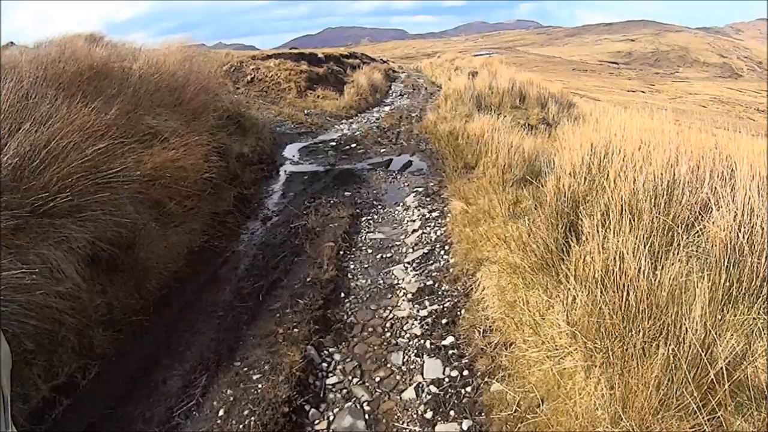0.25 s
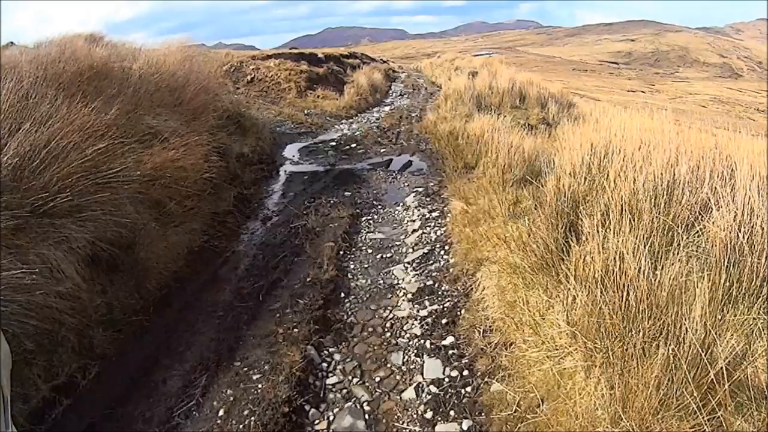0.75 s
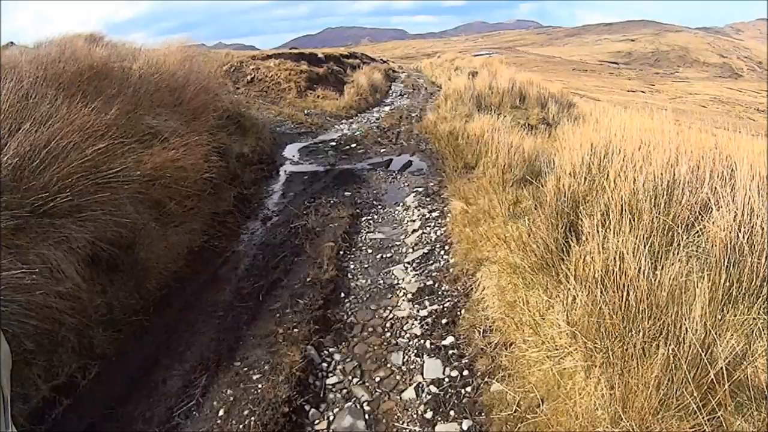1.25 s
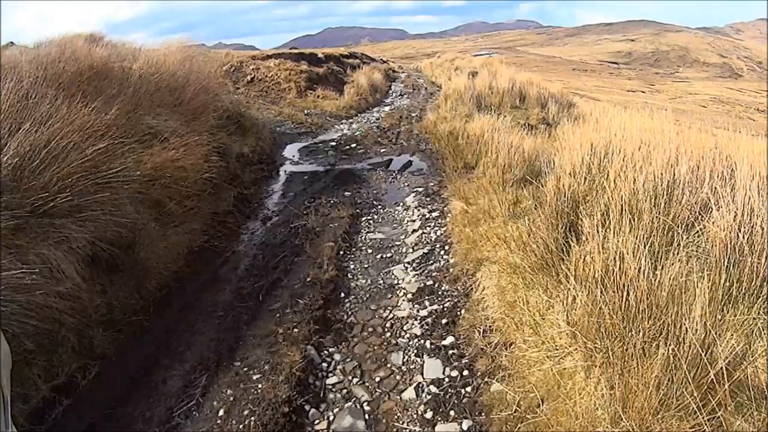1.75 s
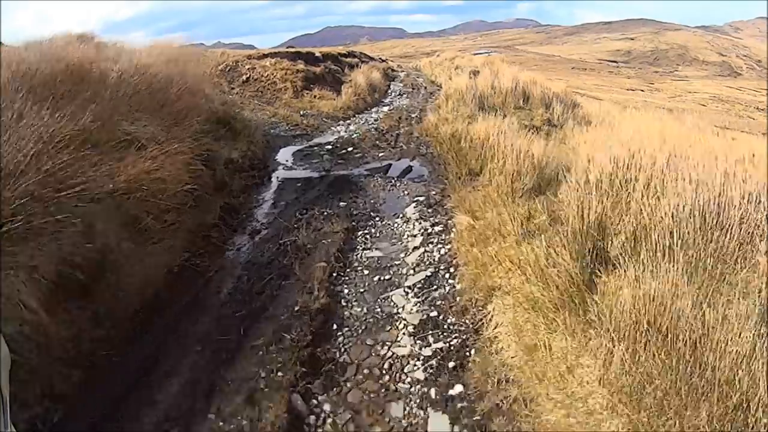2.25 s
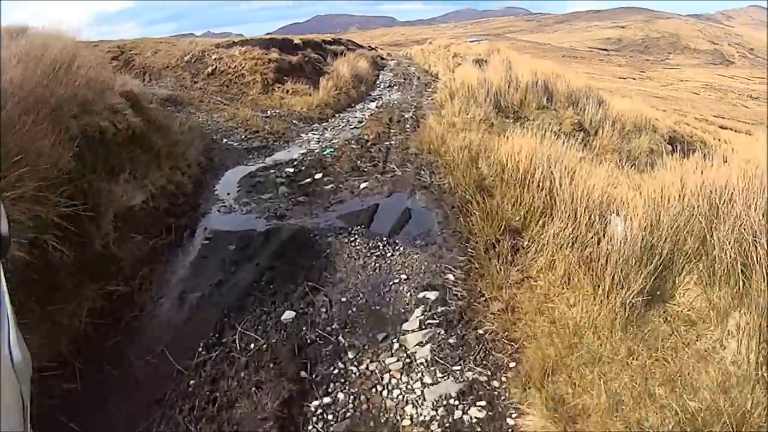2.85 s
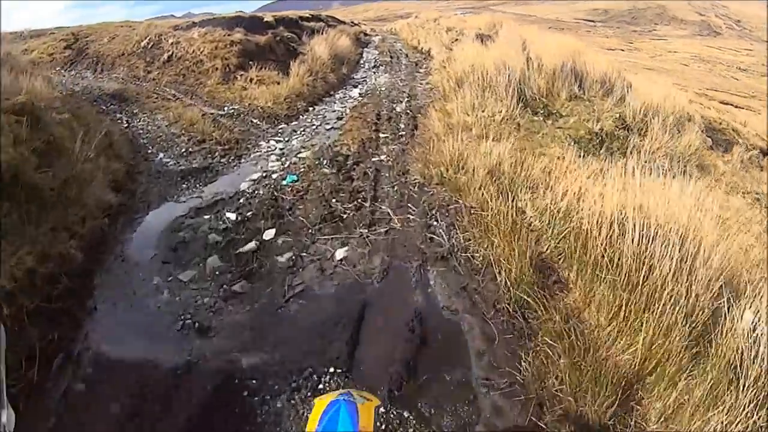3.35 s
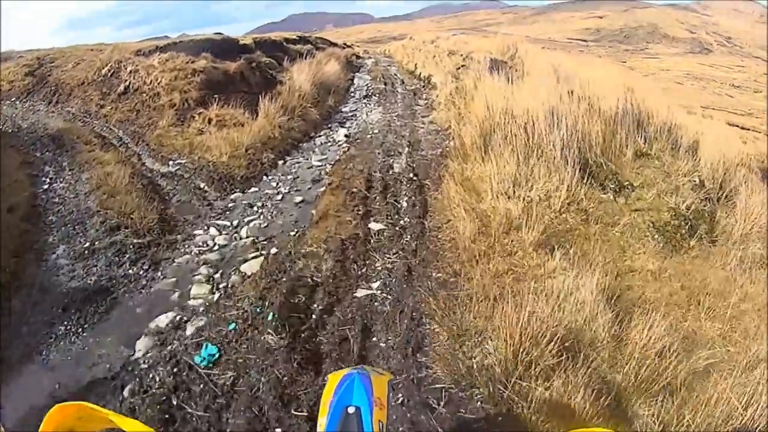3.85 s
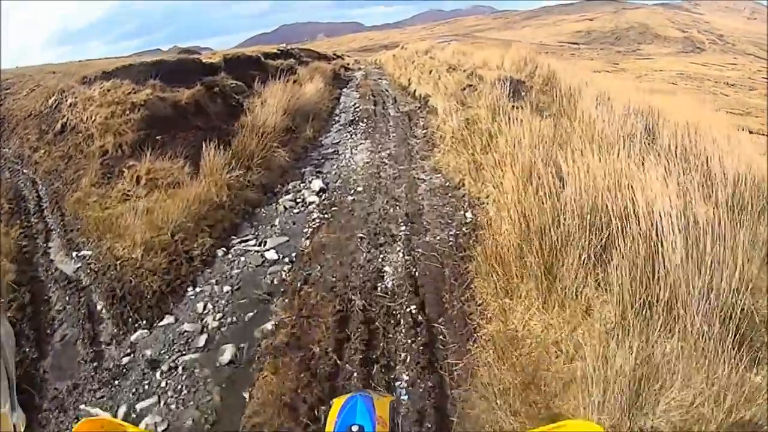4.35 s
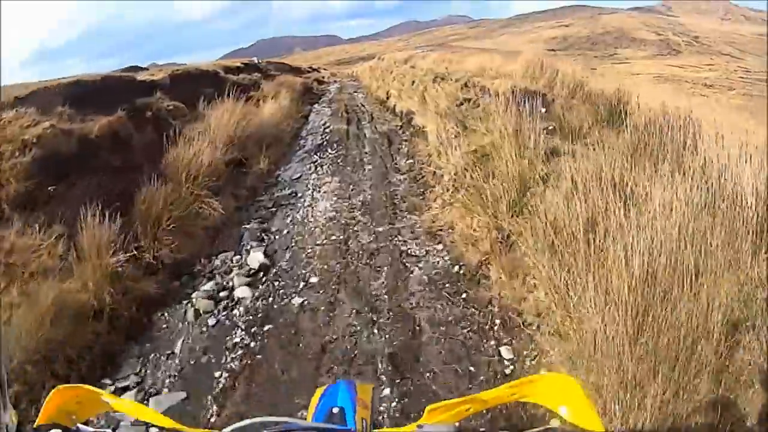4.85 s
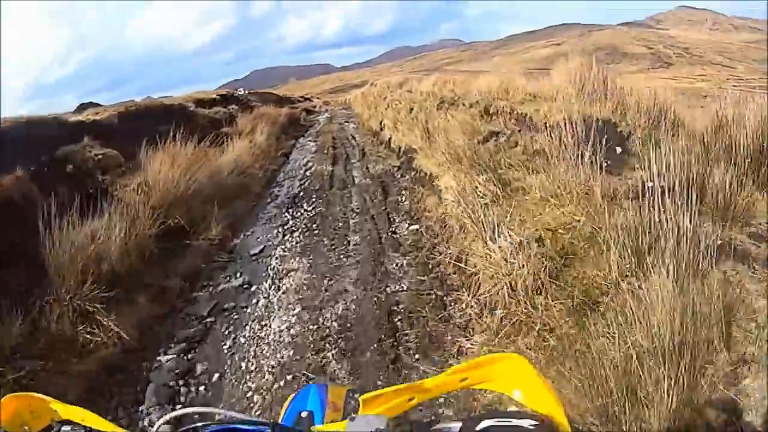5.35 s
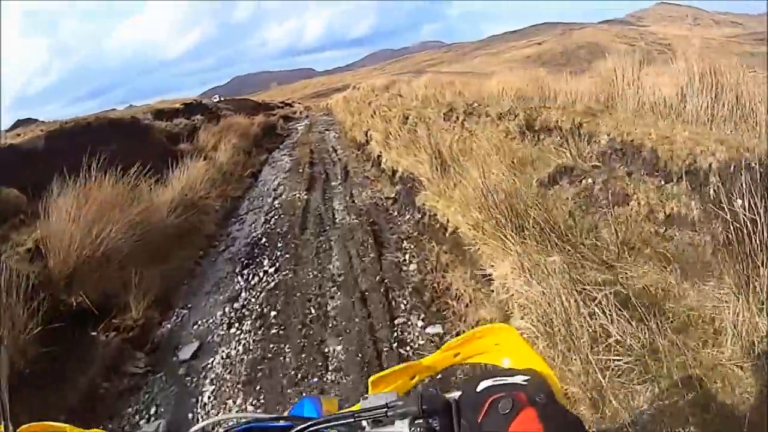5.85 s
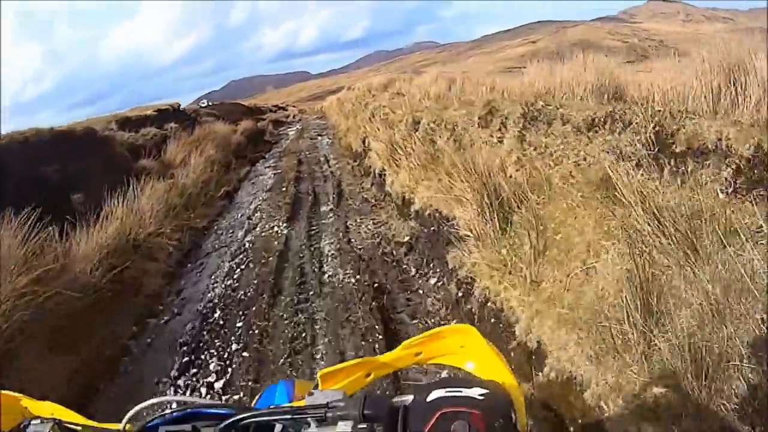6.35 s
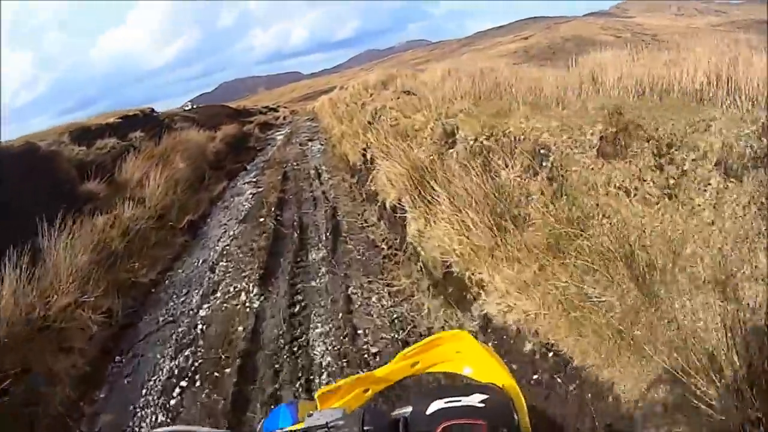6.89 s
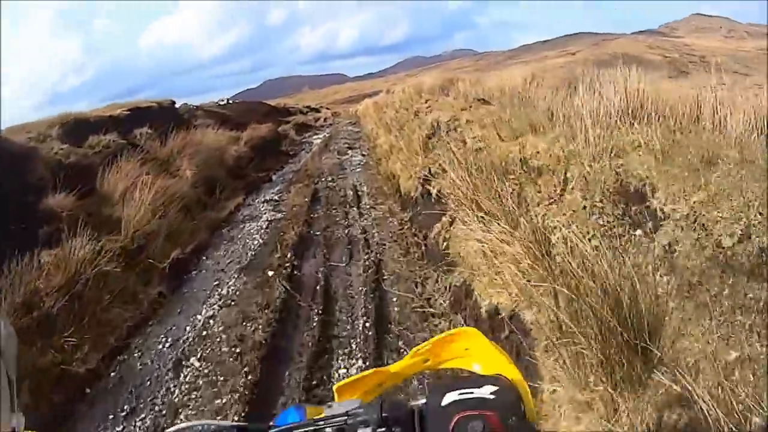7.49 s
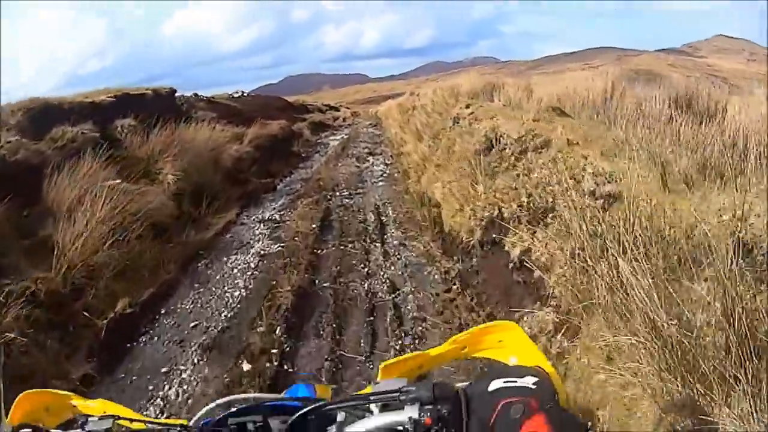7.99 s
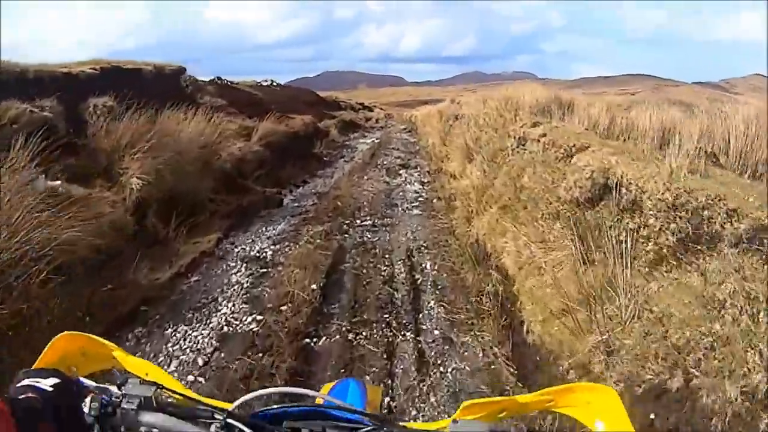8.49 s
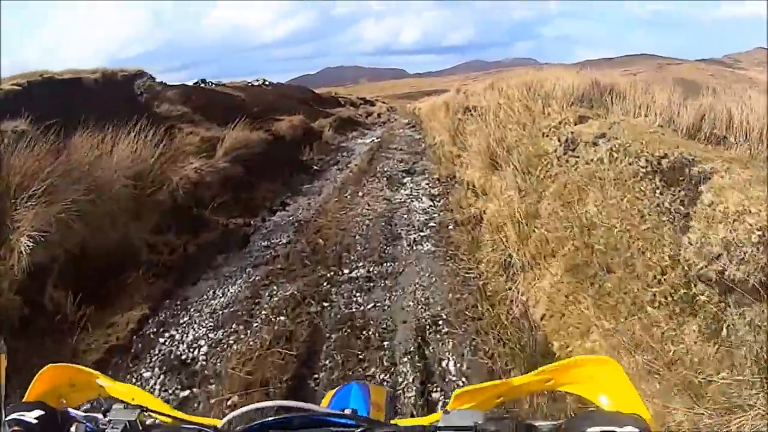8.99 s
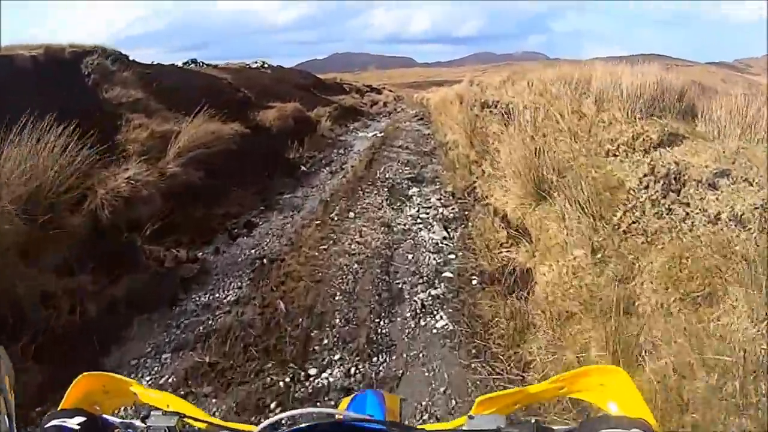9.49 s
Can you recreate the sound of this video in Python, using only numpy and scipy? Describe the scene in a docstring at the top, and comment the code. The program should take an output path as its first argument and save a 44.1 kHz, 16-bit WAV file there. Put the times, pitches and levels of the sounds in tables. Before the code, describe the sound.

A single-cylinder dirt bike plods along a stony wet track, engine clattering and softly puttering, with dull mount knocks and low wind rumble.

```python
"""A stony track of wet gravel, ridden by a plodding single-cylinder four-stroke dirt bike, heard at the
rider's own camera. The exhaust putters softly as sums of decaying pipe resonances. Engine clatter and
tyre crunch are coloured noise, shaped by the engine cycle, the ride and the grains of gravel.
Bumps set off modes of the camera mount, and slowly modulated low noise rumbles as wind on the microphone."""
import sys
import numpy as np
from scipy import signal
from scipy.fft import rfft, irfft
from scipy.io import wavfile
from scipy.ndimage import uniform_filter1d

SR = 44100
rng = np.random.default_rng(int(sys.argv[2]) if len(sys.argv) > 2 else 0)


def dump_mix(stems):
    """Bounce the given channels to the path in sys.argv[1] as a 16-bit WAV at rate SR."""
    frames = np.atleast_2d(stems).T  # one column per channel
    limited = np.clip(frames, -1, 1)  # hard clip at full scale
    pcm = np.round(limited * 32767).astype(np.int16)
    wavfile.write(sys.argv[1], SR, pcm)


N = 429093
T = np.arange(N) / SR
HZ = np.fft.rfftfreq(N, 1 / SR)

# Engine speed and throttle. Each row: time in seconds, firings per second, relative exhaust level in dB.
ENGINE = [(0.0, 20.59, -21.5), (0.28, 19.29, -24.5), (0.55, 20.66, -19.5), (0.86, 24.9, -20.5),
          (1.1, 25.28, -28.0), (1.68, 20.07, -33.0), (1.96, 20.05, -47.5), (2.25, 19.62, -31.5),
          (2.82, 20.5, -23.0), (3.87, 22.37, -23.0), (4.4, 20.36, -26.0), (4.71, 20.94, -20.5),
          (5.49, 18.52, -41.5), (6.56, 16.15, -29.0), (7.25, 15.42, -32.0), (7.8, 17.4, -21.0),
          (8.07, 16.42, -29.5), (9.73, 14.27, -30.5)]
# How hard the bike rattles over the ground. Each row: time in seconds, relative clatter level in dB.
RIDE = [(0.0, -17.5), (0.24, -21.5), (0.95, -18), (1.54, -23), (1.7, -20), (1.98, -22.5), (2.41, -20),
        (4.2, -20.5), (4.31, -22.5), (5.01, -23), (5.66, -26), (7.07, -26.5), (7.15, -25), (7.34, -27.5),
        (7.86, -23), (8.21, -27), (8.62, -25.5), (9.73, -27)]
# seconds by which exhaust and knocks reach the right port sooner
PORT_LAG = .00056
# engine speed and clatter level in easy riding; treble and tyre hiss grow from there
EASY_FIRINGS_PER_S, EASY_DB = 17, -23


def exhaust(level_db=-2, lead=0.00596, uneven_db=1, detune=0.022, rasp=0.1):
    """Impulsive excitation of resonators: each firing puffs through the silencer, whose modes swell and die."""
    # Pipe resonances. Each row: nominal frequency in Hz, relative level in dB, swell time in seconds.
    pipe = [(143, -8.5, 0.0028), (277.5, 3, 0.0055), (253.2, -10.5, 0.015), (321, -12.5, 0.012),
            (501, -14.5, 0.011)]
    out = np.zeros((2, N))
    throttle_db = curve(ENGINE, axis=2)
    t = np.maximum(np.arange(4000) / SR - [[PORT_LAG], [0]], 0)
    for s, draws in zip(cycle_times(0), rng.standard_normal((300, len(pipe), 2))):
        puff = 0
        for (hz, db, rise), (size, off) in zip(pipe, draws):
            tone = np.sin(2 * np.pi * hz * (1 + detune * off) * t)
            puff = puff + amp(db + uneven_db * size) * swell(t, rise) * tone
        add(out, s - lead, amp(level_db + throttle_db[int(s * SR)]) * puff)
    turbulence = 1 + rasp * drift(260)  # roughens each puff
    return out * turbulence * amp([[1], [-1]])


def clatter(level_db=-0.02, whirr_db=-3, throb_db=1.0, throb_share=0.68, rise=0.0037, uneven_db=2.0,
            slop=0.0034, clack_db=-1, clack_rise=0.0019, cruise_db=-27):
    """Superposed impact powers: valves and piston strike the casing over the whirr of gears and chain."""
    # Valve and piston impacts. Each row: share of the cycle after the exhaust puff, relative level in dB,
    # dB more per dB of throttle.
    impacts = [(.17, -3, -0.5), (.5, -9, -0.5), (.63, -3, -0.22), (0.718, -3, 0.44), (.83, -5.5, -0.58)]
    # Broad colour of the clatter. Each row: frequency in Hz, relative level in dB.
    casing = [(90, -22), (200, -24.5), (450, -16.5), (700, -23.5), (900, -18.5), (1060, -11.5), (1600, -11),
              (2150, -11), (2600, -10), (3000, -8.5), (3330, -22.5), (5400, -27), (6100, -40), (12000, -57)]
    # Fixed resonances of the engine covers. Each row: frequency in Hz, width in Hz, lift in dB.
    covers = [(550, 80, 4), (1295, 110, 4), (1560, 90, 2), (2060, 90, 2), (3600, 250, 3.5), (4400, 220, 4),
              (5100, 400, 6)]
    t = np.arange(3000) / SR
    cycles = np.cumsum(curve(ENGINE, axis=1)) / SR
    # the gears load up on each power stroke
    throb = np.cos(2 * np.pi * (cycles - throb_share))
    power = amp(whirr_db + throb_db * throb) ** 2
    load_db = curve(ENGINE, axis=2) - cruise_db
    for share, db, by_load in impacts:
        for s, (size, late) in zip(cycle_times(share), 2 * rng.random((300, 2)) - 1):
            impact_db = db + by_load * load_db[int(s * SR)] + uneven_db * size
            add(power, s + slop * late, amp(impact_db) ** 2 * swell(t, rise))
    # even out the local mean power, so that the ride alone sets the slow level
    power *= amp(curve(RIDE, axis=1) + level_db) ** 2 / uniform_filter1d(power, size=6000)
    for s, db in clacks():
        add(power, s, amp(db + clack_db) ** 2 * swell(t, clack_rise))
    colour_db = spectrum(casing) + sum(db * bump(HZ - hz, width) for hz, width, db in covers)
    noise = np.sqrt(power) * rng.standard_normal((2, N))
    return np.sqrt(power.mean()) * waver(at_ports(noise, colour_db))


def clacks(loose_per_s=2.5, loose_db=-24, loose_spread_db=3.5):
    """A Poisson process: further metallic clacks scatter by chance among those with set times."""
    # Clacks from the bike at set times. Each row: time in seconds, relative level in dB.
    timed = [(0.305, -17), (1.795, -16), (2.608, -16), (3.286, -15), (3.328, -21), (3.374, -16.5),
             (3.794, -12.5), (3.871, -13.5), (4.061, -18), (4.106, -16), (6.201, -20.5), (6.537, -21.5),
             (7.56, -14), (7.896, -24), (8.039, -20), (8.709, -21), (9.024, -24), (9.259, -26),
             (9.397, -19.5)]
    wait, size = rng.random((80, 2)).T
    times = np.cumsum(-np.log(1 - wait)) / loose_per_s
    levels_db = loose_db + loose_spread_db * (2 * size - 1)
    return timed + [(s, db) for s, db in zip(times, levels_db) if s < T[-1]]


def waver(pair, wander_hz=1.73, narrowing_per_db=0.1, treble_hz=5000, treble_width_hz=1600,
          treble_db_per_firing=0.32, patchy_db=2.0, size=1024):
    """Time-varying filtering at constant loudness: rings wander, treble follows engine speed, colour drifts."""
    # Main rings, which shift as bike and rider move. Each row: centre in Hz, wander in Hz,
    # nominal width in Hz, nominal lift in dB, nominal lift wander in dB.
    rings = [(1728, 35, 288, 12, 0.5), (2520, 82, 450, 4, 1.16)]
    hz, s, z = signal.stft(pair, SR, nperseg=size)
    patches = uniform_filter1d(rng.standard_normal(z.shape[1:]), size=3, axis=0)
    patches = uniform_filter1d(patches, size=14, axis=1)
    revs = np.interp(s, T, curve(ENGINE, axis=1)) - EASY_FIRINGS_PER_S
    loudness_db = np.interp(s, T, curve(RIDE, axis=1)) - EASY_DB
    breadth = np.exp(-narrowing_per_db * loudness_db)  # loud clatter has narrower, higher-peaked rings
    treble = bump(hz[:, None] - treble_hz, treble_width_hz)
    lift_db = patchy_db * evened(patches) + treble_db_per_firing * revs * treble
    for ring_hz, off_hz, width_hz, db, off_db in rings:
        shift, lift = (np.interp(s, T, drift(wander_hz)) for _ in range(2))
        ring = bump(hz[:, None] - ring_hz - off_hz * shift, width_hz * breadth)
        lift_db = lift_db + (db + off_db * lift) / np.sqrt(breadth) * ring
    gain = amp(lift_db)
    usual_power = (abs(z[0]) ** 2).mean(1)
    gain /= np.sqrt(np.average(gain ** 2, axis=0, weights=usual_power))
    return signal.istft(z * gain, SR, nperseg=size)[1][:, :N]


def cycle_times(share):
    """Phase is the integral of rate: the moments at which the engine passes a point of its cycle."""
    cycles = np.cumsum(curve(ENGINE, axis=1)) / SR
    return np.interp(np.arange(int(cycles[-1] - share) + 1) + share, cycles, T)


def tyres(level_db=-45.5, follow=0.87, uneven_db=1.64, uneven_hz=9, spray_db=4, grains_per_s=700,
          grain_db=-6, spread_db=3, stone_db=-6, stone_rise=0.0018):
    """Granular noise: grit and water hiss off the tyres, more in a harder ride, with sprays and stone ticks."""
    # Tyres on wet gravel. Each row: frequency in Hz, relative level in dB.
    gravel = [(300, 13), (1500, 7.5), (5000, 7.5), (7200, 5), (7950, 0.5), (8600, 3.5), (9500, 2),
              (10800, -2), (11500, -47), (15500, -19)]
    # Water and grit thrown up. Each row: time of the height in seconds, length in seconds, relative level in dB.
    sprays = [(0.96, 0.23, -50), (3.3, 0.44, -47.5), (3.535, 0.06, -40.5), (3.853, 0.16, -42.5),
              (7.87, .12, -52)]
    # Larger stones flicked up by the tyres. Each row: time in seconds, relative level in dB.
    stones = [(0.1555, -30), (1.3084, -34), (1.817, -28), (8.8792, -37)]
    sizes = amp(spread_db * np.minimum(rng.exponential(1, N), 5))
    grains = sizes * (rng.random(N) < grains_per_s / SR) * rng.choice([-1, 1], (2, N))
    drive = rng.standard_normal((2, N)) + amp(grain_db) * evened(grains)
    rolling = amp(level_db + follow * (curve(RIDE, axis=1) - EASY_DB))
    spray = sum(amp(db + spray_db) ** 2 * bump(T - s, length) for s, length, db in sprays)
    level = np.sqrt(rolling ** 2 + spray) * amp(uneven_db * drift(uneven_hz))
    for s, db in stones:
        add(level, s, amp(db + stone_db) * swell(np.arange(1000) / SR, stone_rise))
    return level * at_ports(drive, spectrum(gravel))


def knocks(level_db=-9.0, detune=0.1, hard_share=0.82, usual_db=-4, sweep=0.00171, low_cut_hz=112,
           rattle_db=-14, rattle_rise=0.016, rattle_hz=620, snap_db=-2.5, phase_spread=0.41,
           damping_spread=0.25, longer_per_db=0.05):
    """Modal ringing: the mount slips, hits its stop and rings dully, upper modes first, with a loose rattle."""
    # Modes of the mount. Each row: nominal frequency in Hz, relative level in dB,
    # nominal time to fall by 60 dB in seconds.
    modes = [(141.7, -11, 0.11), (173.2, -1, 0.093), (325, 5, 0.034), (377.5, 5, 0.021), (543.6, 2, 0.055),
             (770, -2.5, 0.06), (890, -35, 0.041)]
    out = np.zeros((2, N))
    before, blow = .008, .00035  # seconds kept ahead of the blow, seconds of its onset
    t = np.arange(6000) / SR - before
    low_cut = signal.butter(4, low_cut_hz, "highpass", fs=SR, output="sos")
    muffle = signal.butter(4, rattle_hz, fs=SR, output="sos")
    for s, peak_db, hard_db in jolts():
        bright_db = hard_share * (hard_db - usual_db) / 2  # hard blows favour the snap and the upper modes
        rattle = evened(signal.sosfilt(muffle, rng.standard_normal((2, len(t)))))
        ring = amp(rattle_db) * rattle * swell(np.maximum(t, 0), rattle_rise)
        ring += amp(snap_db + bright_db) * snap(t)
        for (hz, db, t60), (off, turn, grip) in zip(modes, 2 * rng.random((len(modes), 3)) - 1):
            age = t + sweep * (hz / rattle_hz) ** 2 / 2  # higher modes start sooner
            tilt_db = bright_db * np.log2(min(hz, rattle_hz) / 330)
            damping = np.exp(damping_spread * grip - longer_per_db * max(tilt_db, 0))
            decay_db = 60 * np.maximum(age, 0) / t60 * damping
            onset = (1 + np.tanh(age / blow)) / 2
            # each mode gets a random phase difference between the ports
            apart = phase_spread * turn * np.array([[1], [-1]])
            tone = np.cos(2 * np.pi * hz * (1 + detune * off) * age - .9 + apart)
            ring += onset * amp(db + tilt_db - decay_db) * tone
        heard_pair = signal.sosfilt(low_cut, ring)
        for port, heard, delay in zip(out, heard_pair, (PORT_LAG / 2, -PORT_LAG / 2)):
            add(port, s - before + delay - .0005, amp(peak_db + level_db) * heard)
    return out


def jolts(rebound_s=.017, spread_s=0.0041, rebound_db=-16.5, spread_db=5.5, rebound_hard_db=-12.5):
    """Inelastic rebound: the mount bounces once after a jolt, weaker and duller, by a varying amount."""
    # Jolts of the mount. Each row: time in seconds, relative level in dB,
    # hardness in dB (upper modes against the lowest).
    first = [(0.015, -9, -13), (0.043, -8.5, -13), (0.098, -14, -1), (0.156, -7.5, -12), (0.369, -4.5, -3),
             (0.461, -7, -10), (0.538, -8.5, -13), (0.779, -5, 0), (1.062, -8, -11), (1.318, -5.5, -12),
             (1.445, -8.5, 2), (1.494, -7, -16), (1.667, -4, -9.5), (2.72, -6, -14), (2.806, -10, -11),
             (3.04, -9, -20), (3.058, -13.5, -26), (3.234, -6.5, -5), (3.479, -7, -8), (3.584, -8, 0),
             (3.643, -10.5, 15.5), (3.678, -14.5, 6), (3.824, -9.5, 13), (3.952, -11, 16), (4.07, -10, -16),
             (4.099, -12, -7), (4.614, -6.5, -15), (4.732, -9.5, -13), (4.862, -5.5, -5), (4.914, -6.5, 1),
             (4.981, -10.5, -15), (5.031, -6, -17), (5.15, -9.5, -15), (5.205, -8, -8), (5.364, -9, -5),
             (5.463, -10, -13), (6.145, -6, -9), (6.659, -5.5, -10), (6.718, -10.5, -18), (6.918, -6.5, 1),
             (7.099, -7.5, -10), (7.142, -12, -9), (7.305, -4, -15), (7.484, -8.5, -14), (7.577, -8, -15),
             (7.678, -7, -15), (7.773, -6.5, -14), (7.861, -11, 15), (7.923, -9, 14), (8.008, -7, -14),
             (8.045, -11, -21), (8.172, -20.5, -23), (8.305, -10, -21), (8.36, -12.5, -19), (8.399, -13, 3),
             (8.556, -5, -4), (8.617, -13.5, 25), (8.856, -6, -9), (9.405, -6, 0)]
    rebounds = []
    for (s, db, hard_db), (late, size) in zip(first, 2 * rng.random((len(first), 2)) - 1):
        again = s + rebound_s + spread_s * late
        rebounds.append((again, db + rebound_db + spread_db * size, hard_db + rebound_hard_db))
    return first + rebounds


def snap(t, top_hz=1850, fall=0.00685, lead=0.005484):
    """Exponential downward chirp: the short sound of the mount slipping, just ahead of its knock."""
    age = np.maximum(t + lead, 0)
    turns = top_hz * fall * (1 - np.exp(-age / fall))
    return swell(age, fall / np.e) * np.sin(2 * np.pi * turns)


def wind(breeze_db=-46.0, swell_db=-0.4, swell_hz=3):
    """Modulated low noise: lumpy buffeting, partly shared by the ports, in a swelling breeze with gusts."""
    # Wind on the microphone. Each row: frequency in Hz, relative level in dB.
    rumble = [(8, -32), (22, 8), (50, 0), (100, -4.5), (200, -10), (500, -10.5), (2000, -69)]
    # Gusts. Each row: time of the height in seconds, length in seconds, dB over the breeze.
    gusts = [(0.05, 0.2, 13), (1.155, 0.77, 7.5), (3.6, 0.18, 8), (5.15, 0.64, 7.5), (8.0, 0.25, 5),
             (8.65, 0.23, 2), (9.4, 0.09, 0)]
    lumps = evened(amp(2 * drift(12)))
    apart = .62  # amplitude of the part that is opposite at the two ports
    colour = amp(spectrum(rumble))
    shared, own = (evened(irfft(rfft(noise) * colour, N)) for noise in rng.standard_normal((2, N)))
    gust_db = sum(db * bump(T - s, length) for s, length, db in gusts)
    level_db = breeze_db + swell_db * drift(swell_hz) + gust_db
    return amp(level_db) * lumps * np.array([shared + apart * own, shared - apart * own])


def at_ports(drive, colour_db):
    """Partial coherence: colours two noises and blends them into left and right, their mean at rms 1."""
    # The two microphone ports. Each row: frequency in Hz, likeness from 0 to 1,
    # radians by which left leads, left minus right in dB.
    ports = [(160, 0.96, 0.0, 0.5), (550, 0.77, -2.1, -1.0), (1100, 0.88, -1.6, 1.7),
             (1400, 0.89, -1.2, -0.3), (1750, 0.97, -0.7, 2.5), (2150, 0.68, 0.3, 0.3),
             (2600, 0.92, 1.2, 4.4), (3100, 0.83, 1.4, 3.0), (4000, 0.34, -0.5, 6.6),
             (5100, 0.76, -0.3, -0.4), (7000, 0.44, -0.3, 0.4), (10000, 0.29, -0.3, 0.7)]
    a, b = rfft(drive, axis=1) * amp(colour_db)
    same = np.clip(spectrum(ports, axis=1), 0, 1)
    right = (same * a + np.sqrt(1 - same ** 2) * b) * np.exp(-1j * spectrum(ports, axis=2))
    lean = amp(spectrum(ports, axis=3) / 2)
    pair = irfft(np.array([a * lean, right / lean]), N, axis=1)
    return pair / np.sqrt(np.mean(pair.mean(0) ** 2))


def drift(hz):
    """Low-passed Gaussian noise: a random wander of rms 1, up to about the given rate."""
    return evened(irfft(rfft(rng.standard_normal(N)) / (1 + (HZ / hz) ** 4), N))


def swell(t, rise):
    """Critically damped response: grows from 0 to 1 in the rise time, then dies away."""
    return t / rise * np.exp(1 - t / rise)


def bump(offset, width):
    """Gaussian bell of height 1 and the given full width at half height."""
    return np.exp(-np.log(16) * (offset / width) ** 2)


def amp(db):
    """Logarithmic level: decibels to amplitude gain."""
    return 10 ** (np.asarray(db) / 20)


def evened(x):
    """Normalisation of energy: scales to rms 1."""
    return x / np.sqrt(np.mean(x ** 2) + 1e-20)


def curve(table, axis):
    """Linear interpolation in time: one column of a time table, for every sample."""
    rows = np.array(table)
    return np.interp(T, rows[:, 0], rows[:, axis])


def spectrum(table, axis=1):
    """Interpolation over log frequency: one column of a frequency table, for every bin."""
    rows = np.array(table)
    return np.interp(np.log(HZ + 1), np.log(rows[:, 0] + 1), rows[:, axis])


def add(mix, s, sound):
    """Superposition: adds a sound into the mix at time s, cut at both ends of the mix."""
    at = int(round(s * SR))
    sound = sound[..., max(-at, 0):]
    part = mix[..., max(at, 0):][..., :sound.shape[-1]]
    part += sound[..., :part.shape[-1]]


def scene():
    """Linear superposition of engine, track, mount and wind."""
    return exhaust() + clatter() + tyres() + knocks() + wind()


def record(dry):
    """Saturation and band limiting: clips at full scale, then low-passes with a linear-phase filter."""
    edge_hz = 15700
    low_pass = signal.firwin(511, edge_hz, window=("kaiser", 9), fs=SR)
    return signal.oaconvolve(np.clip(dry, -1, 1), low_pass[None], "same")


dry = scene()
out = record(dry)
dump_mix(out)
```